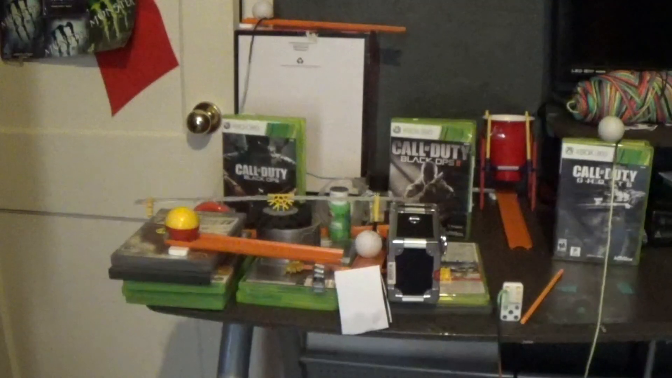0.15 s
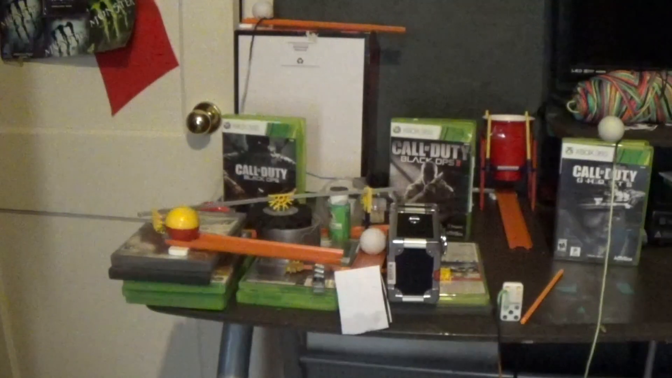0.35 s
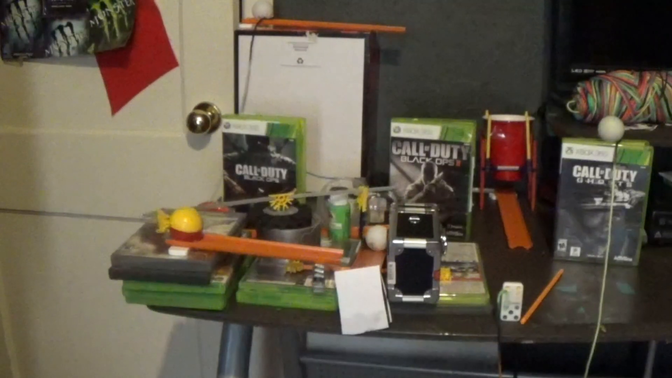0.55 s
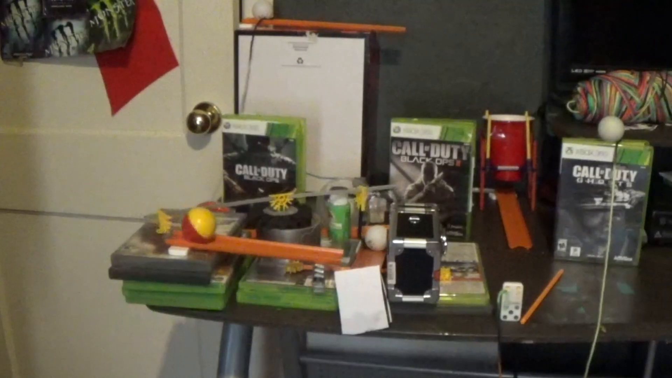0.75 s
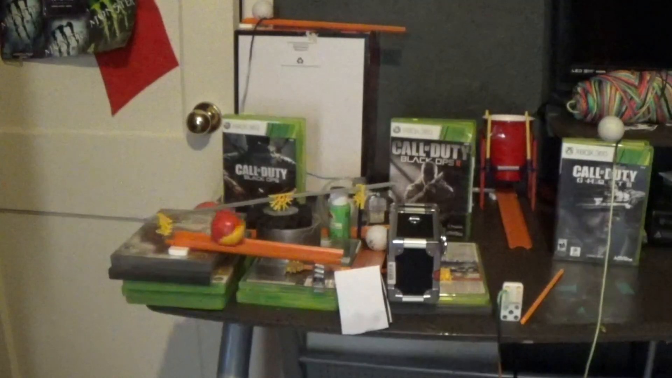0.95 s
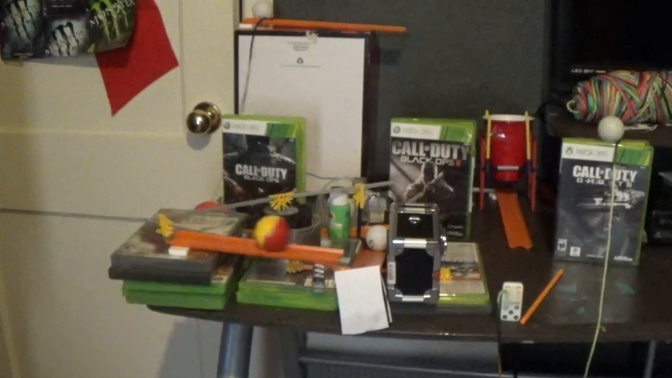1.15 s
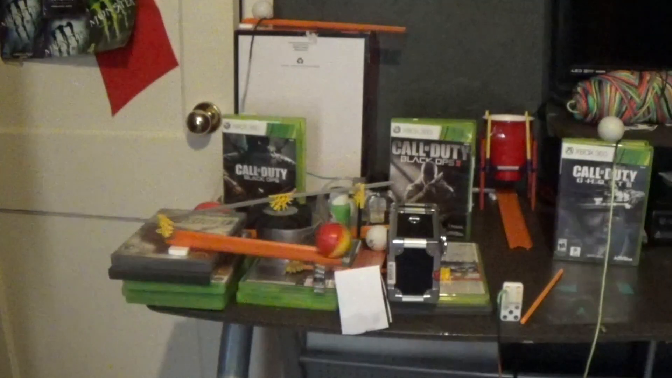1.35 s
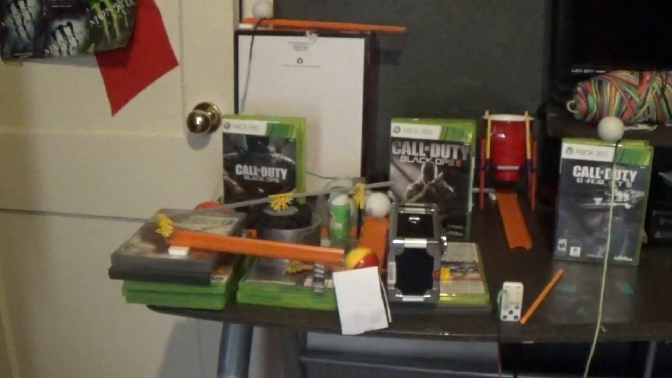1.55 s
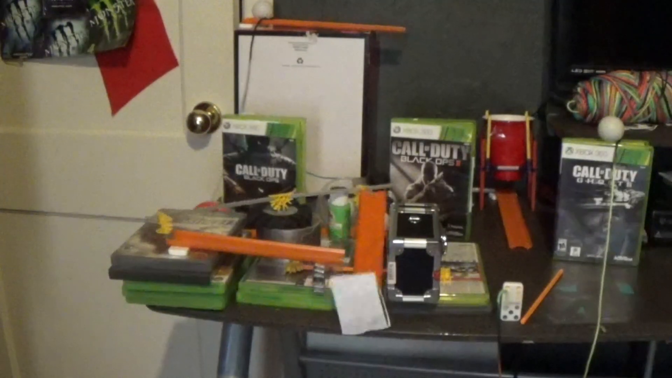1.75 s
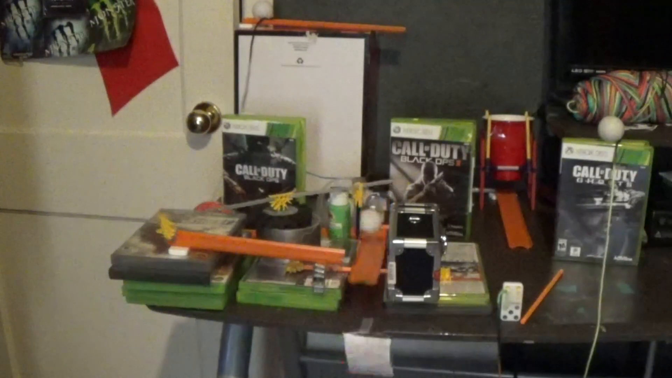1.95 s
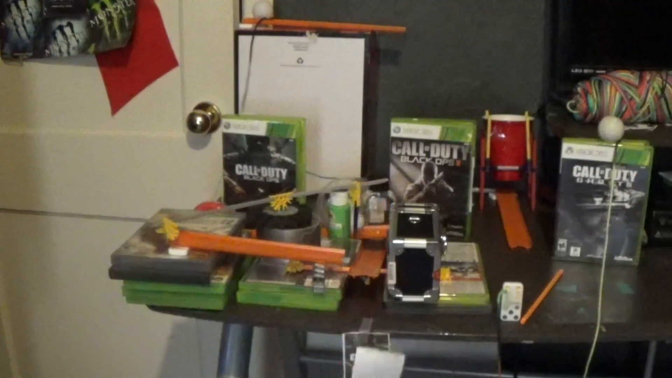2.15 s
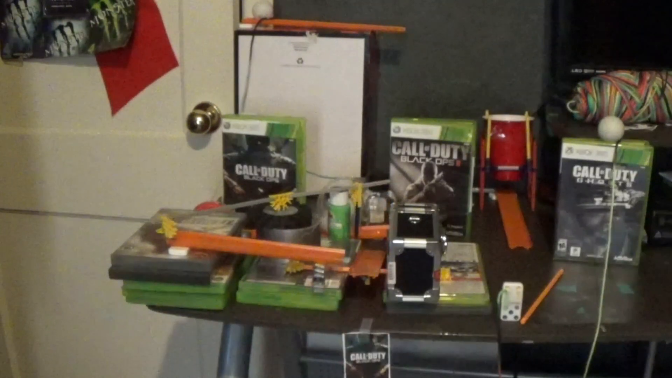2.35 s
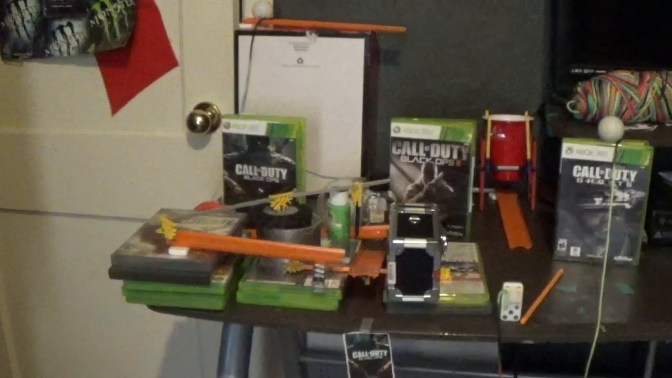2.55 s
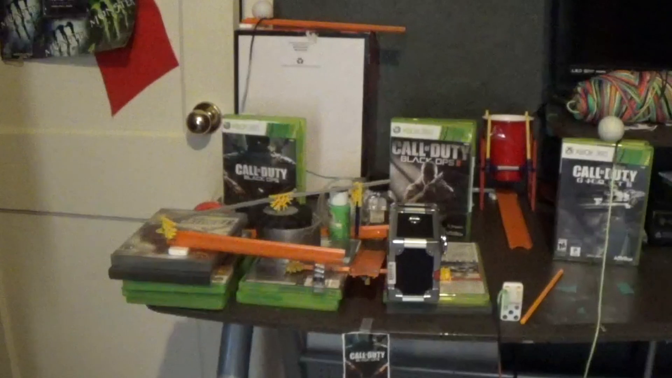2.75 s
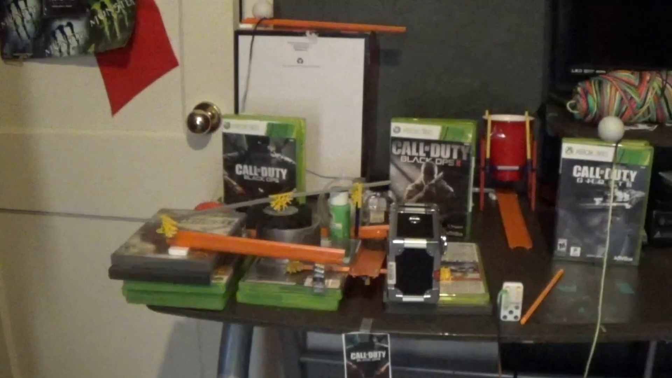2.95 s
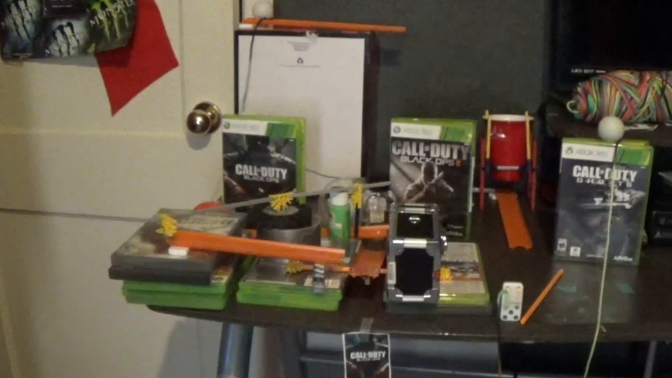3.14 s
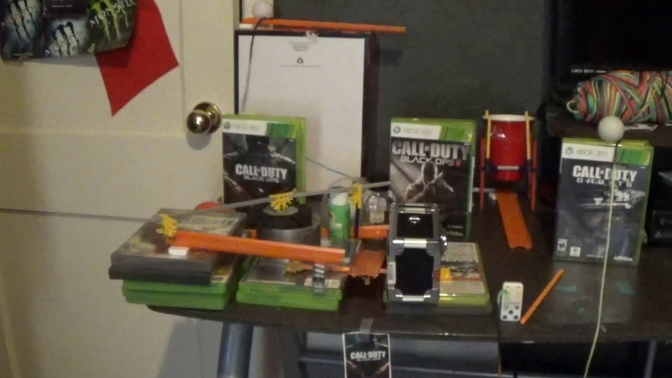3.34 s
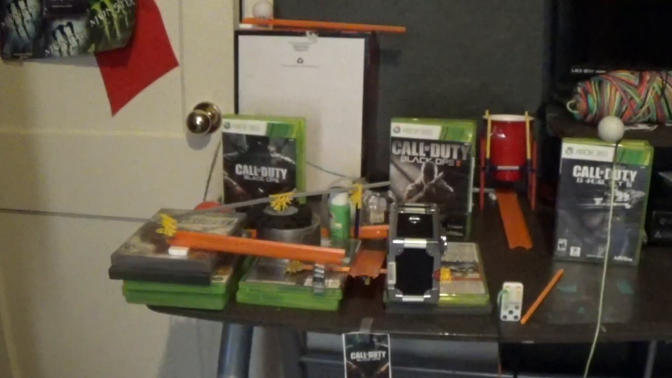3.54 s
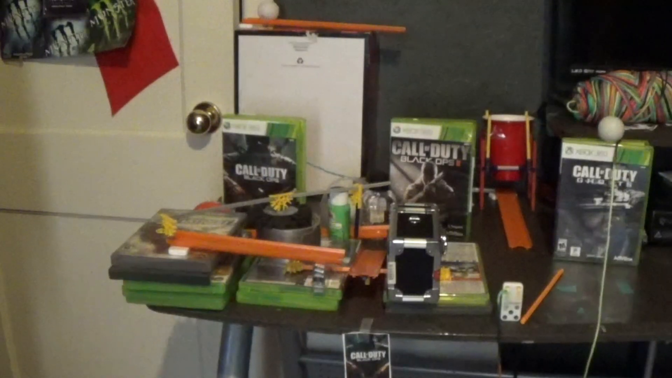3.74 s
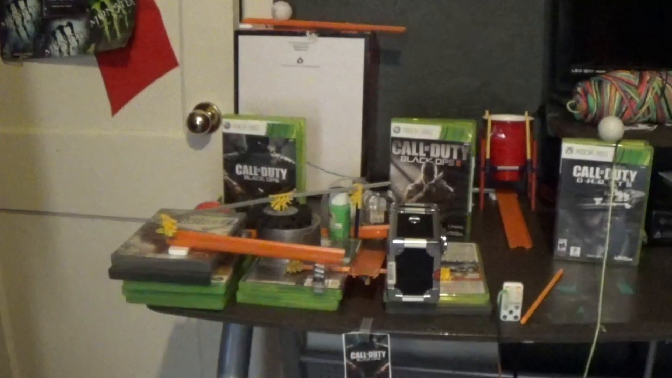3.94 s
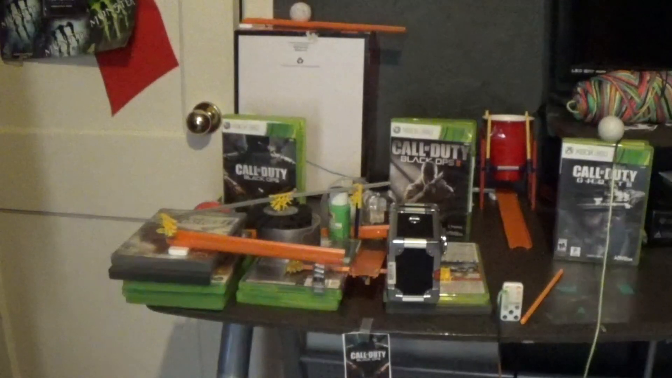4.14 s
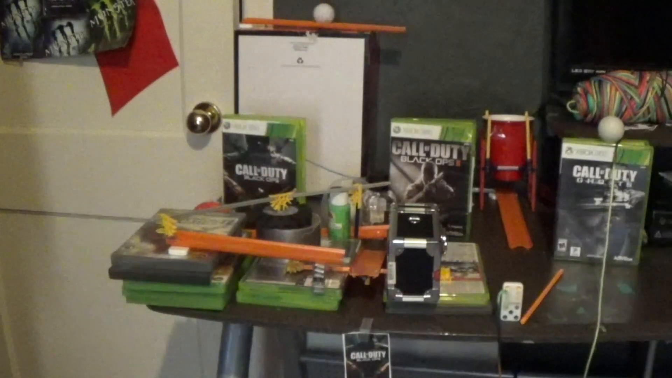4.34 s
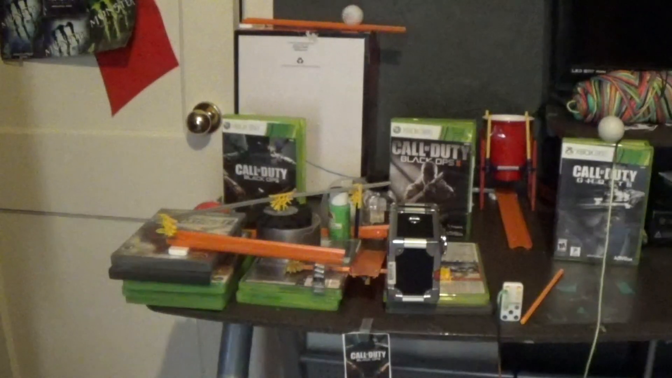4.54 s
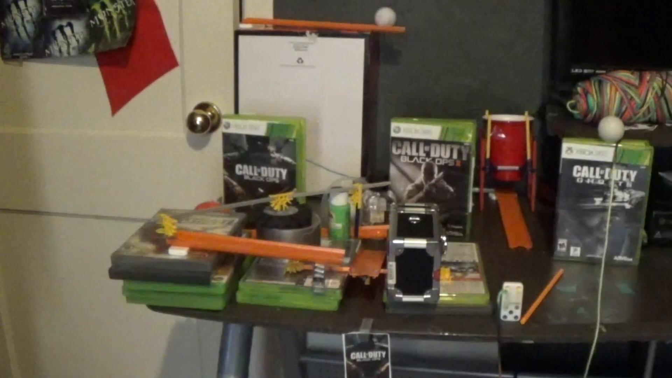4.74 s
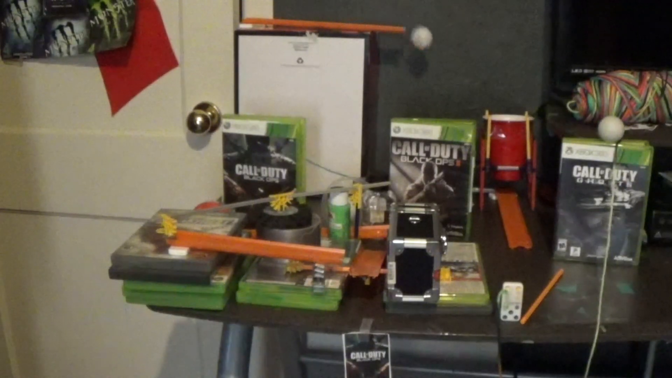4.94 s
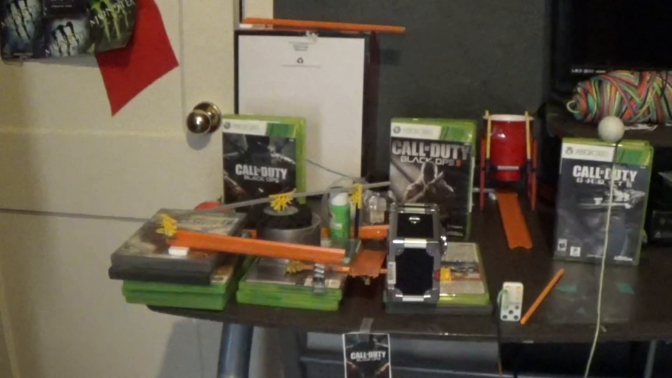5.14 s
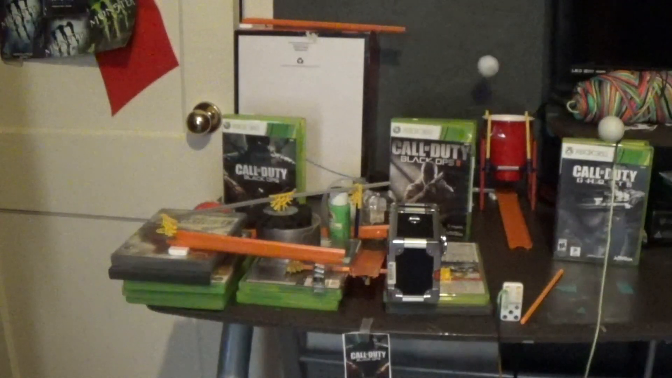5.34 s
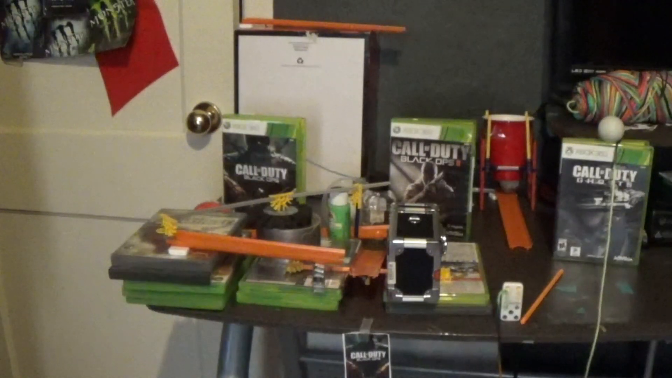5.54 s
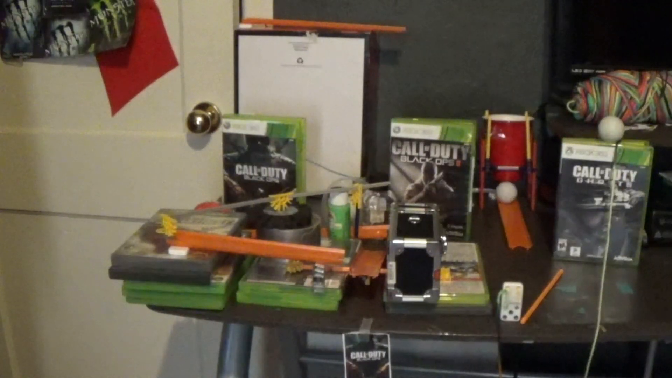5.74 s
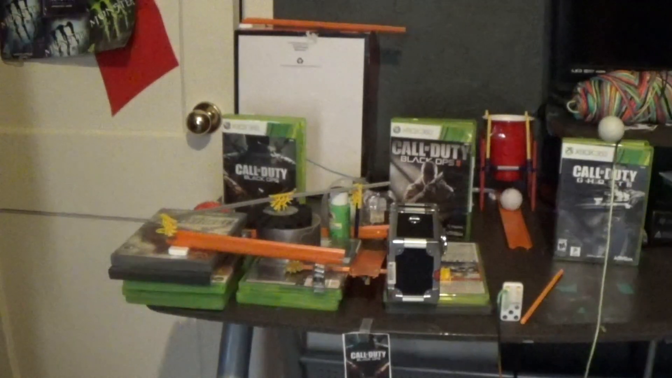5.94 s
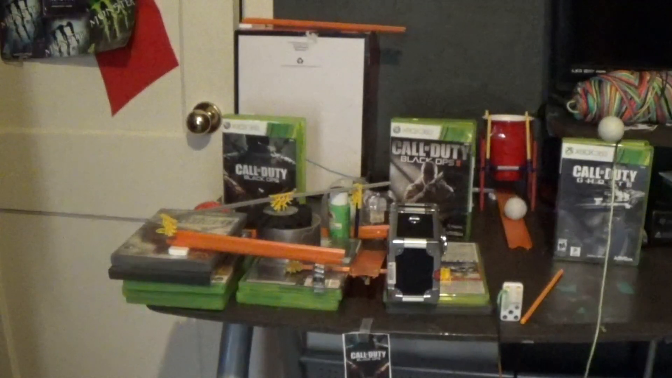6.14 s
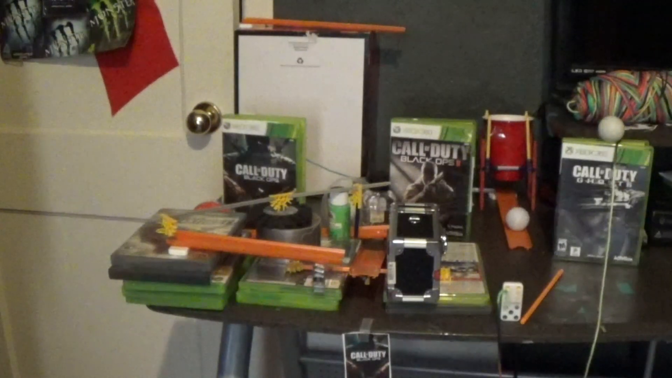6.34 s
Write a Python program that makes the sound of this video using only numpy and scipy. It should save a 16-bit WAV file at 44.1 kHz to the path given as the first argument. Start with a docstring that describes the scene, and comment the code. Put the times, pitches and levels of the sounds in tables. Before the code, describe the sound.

A quiet fan, soft air and low hum, runs throughout a small, briefly echoing room. A ball rolls very faintly until 0.36 s; a trigger clicks twice at 0.44 with a bright ring, and a light tap follows at 0.58. From 1.47 to 1.83 hard levers snap, a heavy ball knocks dully on stacked cases and a light ball taps sharply; plastic track clacks at 2.0. At 2.24 a falling case thuds loudly, shuddering and ringing low, then knocks more softly at 2.6 and 2.8 as another ball rolls. It stumbles near 3.1 and bounces faster and softer from 3.2 to 3.5. A small weight thumps at 3.69, with a faint hop at 3.96, over light rolling until 5.0. At 5.16 a ball slaps a hollow case with a buzzing lid; it ticks a rim at 5.55, rattles brightly in a plastic cup at 5.6, then rolls softly from 5.7 to the end.

```python
"""Table-top chain reaction

A ball rolls down plastic track and trips levers that click and clack. A hanging case drops, thuds against
the table and swings back; a light ball chatters to rest, a weight lands, and a ball bounces off a hollow
case into a plastic cup. Each blow is a sharp contact plus body and room sound; some things ring on too.
Rolling is a stream of tiny bumps. A fan, made of filtered noise and a low hum, runs quietly underneath."""
import sys
import numpy as np
from scipy import signal
from scipy.fft import rfft, irfft
from scipy.io import wavfile
from scipy.ndimage import uniform_filter1d

SR = 44100
rng = np.random.default_rng(int(sys.argv[2]) if len(sys.argv) > 2 else 0)


def master_out(mix):
    """Clip the mix to full scale and print it as 16-bit PCM to the path in sys.argv[1]."""
    frames = np.transpose(np.atleast_2d(mix))
    ceiling = np.clip(frames, -1, 1)
    pcm = np.round(ceiling * 32767).astype(np.int16)
    wavfile.write(sys.argv[1], SR, pcm)


N = 281799  # length of the scene in samples
TAIL = 32768  # longest sound of one blow, in samples
TOP_HZ = 11120  # the treble ends here
SIDE_DB = -9.5  # left-right difference against the shared sound

# Blows. Each row: start in seconds, contact level in dB before the source's gain,
# brightness in dB per octave, room level in dB added to the source's own.
# The first trigger letting go (columns as above)
TRIGGER_BLOWS = [(0.437, -17, 1.6, -11), (0.457, -25.5, -2.6, 1.5)]
# Hard plastic levers snapping over (same columns)
LEVER_BLOWS = [(1.473, -10, 4.5, -18), (1.477, -16, -3, 1), (1.547, -24, 0, -8), (1.557, -23.5, -2, -2),
               (1.588, -24.5, -4, -7), (1.648, -38, -1, -2)]
# A piece of track tipping over and settling (same columns)
TRACK_BLOWS = [(1.602, -25, 1, 0), (1.605, -23, 1, 6), (1.637, -25.5, -1.5, 2.5), (1.916, -31, 0.7, 7),
               (1.999, -9.5, 1.5, 1.5), (2.029, -21, 0, -12), (2.091, -20.5, -0.1, 2), (2.132, -36, 2.5, 9)]
# The light ball tapping hard plastic (same columns)
BALL_BLOWS = [(0.581, -24.5, 5.5, -4), (0.645, -43, 5, -9), (1.685, -20.5, 2, 3), (1.698, -6.5, 1.5, -6),
              (1.705, -14.5, -2, 8), (1.735, -19.5, -3, 7), (1.761, -21.5, 1, 2), (1.825, -30, 7, 6)]
# The heavy ball knocking on the stack of cases (same columns)
STACK_BLOWS = [(1.492, -15.5, 0.88, -2.6), (1.639, -37, 0.35, -2), (1.828, -15, 1.8, 0)]
# The falling case hitting the table front and shuddering (same columns)
CASE_BLOWS = [(2.243, -6, 0.65, -0.5), (2.259, -15.5, 0, 0.5), (2.267, -10.5, -1.5, -9),
              (2.274, -20, -3, -11), (2.297, -18, -4, -17), (2.348, -30.5, -1.5, -11)]
# The case swinging back on its string (same columns)
SWING_BLOWS = [(2.601, -16.5, -0.56, -0.28), (2.792, -25, 1.6, -0.96)]
# The light ball stumbling twice before it drops and settles (same columns)
STUMBLE_BLOWS = [(3.109, -21, 0.44, 0), (3.151, -22.5, 0.068, 0)]
# A small weight landing, and its one hop (same columns)
WEIGHT_BLOWS = [(3.685, -10, 0, -0.5), (3.958, -34, 0.67, 1)]
# A second light ball slapping a hollow case, whose lid buzzes (same columns)
LID_BLOWS = [(5.158, -13, 0.5, -3), (5.165, -11, 1.5, -4.5), (5.172, -18, 1, -1.5), (5.179, -19, -1.4, -3),
             (5.191, -17, 1.3, -3.5)]
# That ball grazing the rim of the cup (same columns)
RIM_BLOWS = [(5.552, -19.5, 0.27, -0.5), (5.586, -18, 2.1, -13)]
# That ball rattling round the cup (same columns)
CUP_BLOWS = [(5.600, -3.5, 1.0, -8.5), (5.608, -12, 1, -9), (5.614, -16, -0.73, -2),
             (5.624, -10, 0.095, -8.5), (5.642, -22.5, -0.74, 0), (5.659, -14.5, -0.5, -10)]

# Repeats of the contact from surfaces close to the bouncing ball. Each row: delay in seconds, level in dB.
NEARBY_ECHOES = [(.0024, -3.5), (.0064, -5.5), (.018, -14)]

# Tone colours of the struck things. Each row: frequency in Hz, relative level in dB.
# Trigger (columns as above)
TRIGGER_COLOUR = [(60, -40), (230, -34), (900, -6), (2300, -14), (2800, -5.5), (3400, -8), (3950, -4),
                  (4300, -4), (4700, 1), (5100, -2), (6500, -3), (7100, -12), (8150, -6), (9400, -13),
                  (10000, -4.5), (11000, -15)]
# Levers (same columns)
LEVER_COLOUR = [(88, -50), (150, -48), (938, -14.5), (1920, -7), (2180, 0), (3550, -5), (4400, -1),
                (5030, -6), (5700, 3.5), (6500, -4.5), (7020, -7), (9000, 0), (10200, -4.5), (11000, -16)]
# Track piece (same columns)
TRACK_COLOUR = [(88, -55), (150, -24), (389, -11), (482, -17), (704, -1), (873, -10.5), (1040, 4),
                (1270, -11), (1370, -2), (2200, -4), (3800, -7.5), (4170, -3.5), (4800, -10.5),
                (6700, -13.5), (7700, -23), (8500, -15), (11000, -15.5)]
# Light ball on hard plastic (same columns)
BALL_COLOUR = [(88, -39), (150, -40), (239, -25), (297, -11), (577, -6.5), (1600, -7), (2260, -1),
               (2700, -9), (3300, -1.5), (3650, -7), (4100, -2.5), (5300, -8.5), (5900, -8), (6650, -17.5),
               (7410, -19.5), (8900, -7), (9450, -15), (10400, -8), (11000, -11)]
# Stack of cases (same columns)
STACK_COLOUR = [(100, -28), (200, -17.5), (350, -1.5), (700, 2), (1200, 1.5), (1700, -5.5), (2200, -16),
                (2600, -24), (5000, -31), (7500, -39), (11000, -46)]
# Falling case (same columns)
CASE_COLOUR = [(40, -30), (140, -19), (240, 0.5), (330, -2.5), (450, 2.5), (750, -2), (950, -8),
               (1100, -17.5), (3200, -19), (5500, -24.5), (7500, -35.5), (11000, -43.5)]
# Case swinging back (same columns)
SWING_COLOUR = [(50, -36), (140, -20.5), (200, -12.5), (240, -3.5), (400, -5.5), (520, -5.5), (700, -23),
                (1000, -18.5), (2600, -22.5), (4500, -36.5), (11000, -51)]
# Ball bouncing on the spot (same columns)
BOUNCE_COLOUR = [(60, -27), (190, -19), (240, -17), (480, -2.5), (900, -1.5), (1130, 6.5), (1400, -2.5),
                 (1780, 0), (2280, -19.5), (2800, -4.5), (3200, -5), (3700, -21), (4300, -15), (7000, -26),
                 (11000, -18)]
# Small weight (same columns)
WEIGHT_COLOUR = [(35, -73), (60, -38), (121, -21), (227, -14), (351, -6.5), (446, -4.5), (476, -2),
                 (567, -2), (839, -7.5), (1110, -18), (1360, -13.5), (3040, -20.5), (5240, -30),
                 (9860, -37), (11000, -39)]
# Hollow case and its lid (same columns)
LID_COLOUR = [(50, -45), (130, -14), (240, -23), (310, -1.5), (380, -10), (600, 2), (850, -4), (1400, -0.5),
              (1750, -2.5), (2100, -6), (2500, -17), (3100, -13), (3500, -9.5), (4400, -25), (4820, -17.5),
              (5100, -22), (5320, -20), (5850, -32), (7100, -21), (7650, -35), (11000, -28)]
# Rim of the cup (same columns)
RIM_COLOUR = [(60, -39), (300, -10), (1500, -9), (3000, -11), (3600, -1.5), (4300, -3), (4900, -6),
              (5500, -6), (6600, -14), (8600, -8), (11000, -10)]
# Inside of the cup (same columns)
CUP_COLOUR = [(50, -29), (200, -21), (300, -4), (1250, -3.5), (1520, 1), (1750, 1), (2300, -3), (3100, 3.5),
              (3400, 0.5), (3750, 4.5), (4400, -0.5), (4800, -4), (7200, -12), (11000, -11)]

# Tones that ring on. Each row: frequency in Hz, relative level in dB, time to fall 60 dB in seconds.
# Trigger (columns as above)
TRIGGER_RING = [(2720, -10, 0.33), (2800, -5, 0.36), (3880, -5, 0.35), (4770, 1, 0.26), (4680, -2, 0.32),
                (4880, -3, 0.3), (5500, -6, 0.22), (8150, -6, 0.15)]
# Light ball on hard plastic (same columns)
BALL_RING = [(2750, -4, 0.25), (4000, 0, 0.22)]
# Falling case (same columns)
CASE_RING = [(246, 14.5, 0.11), (270, -2, 0.26), (293, 4, 0.25), (345, -5, 0.22), (398, 13, 0.19),
             (477, 8, 0.17), (525, -7, 0.28), (568, -8, .18), (680, 1, 0.17), (772, -1, 0.39),
             (855, -3, 0.29), (920, -15, 0.3)]
# Case swinging back (same columns)
SWING_RING = [(234.8, -2, 0.18), (260.7, -5, 0.22), (322, -4.5, 0.25), (403, -2.5, 0.23)]
# Ball bouncing on the spot (same columns)
BOUNCE_RING = [(8850, 0, 0.014), (10280, 1, 0.02)]
# Small weight (same columns)
WEIGHT_RING = [(288, -10, 0.38), (347, -3, 0.27), (422, -3, 0.2), (488, 1, 0.27), (540, -1, 0.28),
               (708, -3, 0.29), (824, -4, 0.26), (865, -16, 0.26)]
# Hollow case and its lid (same columns)
LID_RING = [(610, 17, 0.25), (914, 12, 0.26), (1270, -3, .3), (1390, 2, 0.27), (1510, -4, 0.27),
            (1607, 0, 0.33), (1700, 1, 0.44), (2140, -6, 0.47), (3350, -5, 0.37), (3600, -7, .3),
            (4870, -16, .28), (5270, -14, .28)]
# Rim of the cup (same columns)
RIM_RING = [(4360, 5, 0.062), (3550, -4, 0.074), (5500, -5, 0.064)]
# Inside of the cup (same columns)
CUP_RING = [(1380, -2, 0.23), (1525, 2, 0.16), (2600, -2.2, 0.16), (3170, 2, 0.19), (3492, -0.2, 0.17),
            (3610, 1, 0.17), (3777, 0, 0.17), (4280, -1, 0.17), (4180, -2, .17)]

# Shell resonances of the first light ball. Each row: frequency in Hz, width in Hz, relative level in dB.
FIRST_SHELL = [(8870, 840, 1), (10240, 530, -0.5)]
# Shell resonances of the ball that flies into the cup (same columns)
SECOND_SHELL = [(8480, 570, 0.5), (10060, 960, -4.5)]

# Runs along the track. Each row: start in seconds, end in seconds, starting rumble level in dB,
# starting shell fizz level in dB, change over the run in dB.
TRACK_RUNS = [(0, 0.358, -73, -65.5, 10), (2.302, 3.13, -55.5, -70, -1), (3.48, 5.0, -55.5, -68, -6),
              (5.7, 6.45, -56.5, -69, -4.5)]
# Colour of the rolling rumble. Each row: frequency in Hz, relative level in dB.
RUMBLE_COLOUR = [(30, -25), (100, -17), (250, -12), (400, -9.5), (700, -8), (1500, -25.5), (4000, -18.5),
                 (11000, -31.5)]
# How fast the room dies away. Each row: frequency in Hz, time to fall 60 dB in seconds.
ROOM_DECAY = [(150, 0.33), (500, 0.42), (1500, 0.35), (4000, 0.32), (10000, 0.26)]
# Stereo width of machine and rolling. Each row: frequency in Hz, gain of the left-right difference in dB.
MACHINE_WIDTH = [(500, -.5), (1200, -2), (5000, -1), (9000, -6)]
# Colour of the fan's air. Each row: frequency in Hz, relative level in dB.
AIR_COLOUR = [(18, -76), (30, -48), (58, -54), (77, -22), (142, -16), (165, -15), (257, -4), (321, -4.5),
              (364, -4), (554, -5), (596, -4), (953, -11), (1220, -11.5), (4520, -21), (11000, -27.5)]
# Fan tones, the lowest being the motor. Each row: frequency in Hz, level in dB.
FAN_TONES = [(91.5, -72), (452.2, -66), (592.2, -67.5), (877.5, -83)]
# Stereo width of the fan noise. Each row: frequency in Hz, gain of the left-right difference in dB.
FAN_WIDTH = [(60, -22), (110, -22), (190, -23), (350, -22), (620, -14.5), (1110, -7.5), (2000, -6.5),
             (3580, -6), (6430, -2), (11500, -6.5)]


def machine():
    """All the things that are struck, from the first trigger to the cup."""
    start = trigger() + levers() + track() + ball_taps() + stack()
    middle = falling_case() + swinging_case() + bouncing_ball() + weight()
    return start + middle + lid() + cup_rim() + cup()


def trigger():
    """A trigger lets go with two clicks and a bright ring."""
    return blows(TRIGGER_BLOWS, TRIGGER_COLOUR, gain_db=1.5, body_s=0.051, body_db=4.5, room_db=5,
                 pan_db=0.5, modes=TRIGGER_RING, modes_db=-4.5)


def levers():
    """Hard plastic levers snap over with dense, bright clicks."""
    return blows(LEVER_BLOWS, LEVER_COLOUR, gain_db=1.5, body_s=0.059, body_db=7.5, room_db=8, pan_db=0.5)


def track():
    """A piece of plastic track clacks as it tips and settles."""
    return blows(TRACK_BLOWS, TRACK_COLOUR, gain_db=1, body_s=0.033, body_db=7, room_db=4.5, pan_db=0)


def ball_taps():
    """A light ball taps hard plastic and its thin shell adds treble."""
    return blows(BALL_BLOWS, BALL_COLOUR, gain_db=-2, body_s=0.015, body_db=4, room_db=3, pan_db=0,
                 ball=FIRST_SHELL, ball_db=-10.5, modes=BALL_RING, modes_db=-7.5)


def stack():
    """A heavy ball knocks on stacked cases, which answer with a dull, dense sound."""
    return blows(STACK_BLOWS, STACK_COLOUR, gain_db=-0.5, body_s=0.075, body_db=7.5, room_db=8, pan_db=-0.5)


def falling_case():
    """A case hits the table front, and its low tones ring while it shudders."""
    return blows(CASE_BLOWS, CASE_COLOUR, gain_db=3.5, body_s=0.031, body_db=0.5, room_db=4.5,
                 pan_db=-1.5, modes=CASE_RING, modes_db=-4.5)


def swinging_case():
    """The case swings back on its string with two softer, ringing knocks."""
    return blows(SWING_BLOWS, SWING_COLOUR, gain_db=2, body_s=0.024, body_db=-1.5, room_db=1.5,
                 pan_db=-1, modes=SWING_RING, modes_db=3)


def bouncing_ball():
    """A light ball stumbles twice, then bounces ever faster on one spot, with echoes from close by."""
    return blows([*STUMBLE_BLOWS, *settling()], BOUNCE_COLOUR, gain_db=-9.5, body_s=0.011, body_db=9.5,
                 room_db=11.5, pan_db=0, ball=FIRST_SHELL, ball_db=-11.5, modes=BOUNCE_RING, modes_db=1,
                 echoes=NEARBY_ECHOES, moving=False)


def settling(count=10):
    """A dropped ball keeps a share of its speed at each bounce, so hops get shorter and softer together."""
    drop_s, first_hop_s, speed_kept = 3.204, 0.0393, 0.906
    first_db, loss_db, bright_db = -20, 1.12, 0  # level before gain, loss per bounce, tilt per octave
    k = np.arange(count)
    hops = first_hop_s * speed_kept ** k
    starts = drop_s + np.cumsum(hops) - hops
    levels = first_db - loss_db * k
    return [(s, db, bright_db, 0) for s, db in zip(starts, levels)]


def weight():
    """A small weight lands and hops once, setting low tones ringing."""
    return blows(WEIGHT_BLOWS, WEIGHT_COLOUR, gain_db=1.5, body_s=0.038, body_db=3.5, room_db=5,
                 pan_db=0, modes=WEIGHT_RING, modes_db=1.5)


def lid():
    """A second light ball slaps a hollow case; the lid's quick repeated taps make a buzz."""
    return blows(LID_BLOWS, LID_COLOUR, gain_db=0, body_s=0.021, body_db=9.5, room_db=11, pan_db=-0.4,
                 ball=SECOND_SHELL, ball_db=-4, modes=LID_RING, modes_db=1.5)


def cup_rim():
    """The ball grazes the rim with two ticks and a short ring."""
    return blows(RIM_BLOWS, RIM_COLOUR, gain_db=1.5, body_s=0.051, body_db=5, room_db=5.5, pan_db=-1,
                 modes=RIM_RING, modes_db=2)


def cup():
    """The ball rattles round the cup, whose wall rings with its shell."""
    return blows(CUP_BLOWS, CUP_COLOUR, gain_db=0, body_s=0.032, body_db=-0.5, room_db=16, pan_db=-0.5,
                 ball=SECOND_SHELL, ball_db=-5, modes=CUP_RING, modes_db=-1)


def blows(table, colour, gain_db, body_s, body_db, room_db, pan_db, ball=(), ball_db=0,
          modes=(), modes_db=0, echoes=(), moving=True):
    """Each blow is a sharp contact, a burst of dense body modes, any long modes, and the room's answer."""
    hz = bins(TAIL)
    out = np.zeros((2, N + TAIL))
    gain = undb(lookup(colour, hz)) + undb(ball_db) * shell(hz, ball)
    ring = ringing(modes) * undb(modes_db) if modes else 0
    for k, (s, db, bright_db, share_db) in enumerate(table):
        if moving or k == 0:  # each new spot excites the body and the room differently
            near = undb(body_db) * body(body_s)
            far = room()
            near[:, 0] += 1  # the contact itself
            repeats = sum(undb(echo_db) * np.roll(near, int(lag * SR), axis=1) for lag, echo_db in echoes)
            near = near + repeats
        # a harder contact tilts the spectrum upwards
        tilt = undb(bright_db * np.log2(hz / 1000))
        contact = causal(gain * tilt / (1 + (hz / TOP_HZ) ** 20))
        contact /= np.abs(contact).max()
        response = near + undb(room_db + share_db) * far
        sound = irfft(rfft(contact) * rfft(response))
        sound = sound + ring * np.linalg.norm(contact)
        start = int(s * SR)
        out[:, start:start + TAIL] += undb(db + gain_db) * sound
    pan = undb(np.array([[pan_db], [-pan_db]]) / 2)  # positive leans left
    return out[:, :N] * pan


def shell(hz, resonances):
    """The two bright resonances of a thin-walled ball."""
    return sum(undb(db) / (1 + ((hz - f) / width * 2) ** 6) ** 0.5 for f, width, db in resonances)


def body(t60, treble_share=0.92):
    """Dense, short modes of a plastic body; the high ones stop first."""
    return unit(dying(stereo_noise(TAIL), [(600, t60), (7000, t60 * treble_share)]))


def ringing(modes):
    """Damped sines that swell over a few cycles, slightly out of step between left and right."""
    t, out = np.arange(TAIL) / SR, 0
    turns = rng.random(len(modes))
    leans = rng.choice([-1, 1], len(modes))
    for (f, db, t60), turn, lean in zip(modes, turns, leans):
        apart = lean * undb(SIDE_DB) * np.array([[1], [-1]])
        phase = 2 * np.pi * (f * t + turn) + apart
        swell = 1 - np.exp(-t * f / 2)
        out = out + undb(db) * fade(t60) * swell * np.sin(phase)
    return unit(out)


def rolling(bumps_per_s=220, scatter_db=4):
    """Tiny bumps in the track make it rumble and the ball's shell fizz; each run swells, drifts and dies."""
    attack_s, release_s = 0.014, 0.037
    t, rumble, fizz = np.arange(N) / SR, 0, 0
    for start, end, rumble_db, fizz_db, drift_db in TRACK_RUNS:
        gate = np.clip((t - start) / attack_s, 0, 1) * np.clip((end - t) / release_s, 0, 1)
        progress = np.clip((t - start) / (end - start), 0, 1)
        run = gate * undb(drift_db * progress)
        rumble = rumble + undb(rumble_db) * run
        fizz = fizz + undb(fizz_db) * run
    sizes = undb(scatter_db * np.clip(rng.standard_normal(N), -2, 2))
    bumps = (rng.random(N) < bumps_per_s / SR) * sizes
    heard = bumps + signal.fftconvolve(bumps[None], room(), axes=1)[:, :N]
    hz = bins(N)
    track_sound = coloured(heard, undb(lookup(RUMBLE_COLOUR, hz)))
    shell_sound = coloured(heard, shell(hz, FIRST_SHELL))
    return rumble * track_sound + fizz * shell_sound


def room(build_s=0.0041, lumpy_db=6.5, lumpy_s=0.18):
    """Distinct early reflections merge into a tail whose treble dies first."""
    t = np.arange(TAIL) / SR
    lumps = undb(lumpy_db * rng.standard_normal(TAIL) * np.exp(-t / lumpy_s))
    lumps /= np.sqrt(uniform_filter1d(lumps ** 2, size=400))  # keep the average level even
    build_up = 1 - np.exp(-(t / build_s) ** 2)
    return unit(dying(stereo_noise(TAIL) * lumps, ROOM_DECAY) * build_up)


def fan(line_width_hz=6, air_db=-51):
    """Steady rush of air, a clean motor hum and a few wavering blade tones."""
    hz = bins(N)
    (motor_hz, motor_db), *blades = sorted(FAN_TONES)
    motor = undb(motor_db) * np.sqrt(2) * np.sin(2 * np.pi * motor_hz * np.arange(N) / SR)
    air = widened(rng.standard_normal((2, N)), FAN_WIDTH)
    swirl = widened(rng.standard_normal((2, N)), FAN_WIDTH)
    tones = 0
    for f, db in blades:  # a narrow band of noise wavers like an unsteady tone
        narrow = 1 / (1 + ((hz - f) / line_width_hz) ** 2)
        tones = tones + undb(db) * coloured(swirl, narrow)
    return motor + tones + undb(air_db) * coloured(air, undb(lookup(AIR_COLOUR, hz)))


def stereo_noise(size):
    """Diffuse sound: left and right share most of the noise and differ a little."""
    mid, side = rng.standard_normal((2, size))
    return mid + undb(SIDE_DB) * side * np.array([[1], [-1]])


def dying(noise, t60s):
    """Let each part of the spectrum die at its own rate, given as (Hz, seconds to fall 60 dB) points."""
    centres, t60s = np.transpose(t60s)
    shares = [np.interp(np.log(bins(TAIL)), np.log(centres), row) for row in np.eye(len(t60s))]
    spectrum = rfft(noise)
    return sum(irfft(spectrum * share) * fade(t60) for share, t60 in zip(shares, t60s))


def fade(t60):
    """Exponential decay that loses 60 dB in t60 seconds."""
    return np.exp(-np.log(1000) * np.arange(TAIL) / SR / max(t60, 1e-3))


def causal(gain):
    """The most compact pulse that has this spectrum and nothing before its start."""
    cepstrum = irfft(np.log(gain + 1e-9))
    cepstrum[1:TAIL // 2] *= 2  # fold the backward half onto the forward half
    cepstrum[TAIL // 2 + 1:] = 0
    return irfft(np.exp(rfft(cepstrum)))


def coloured(x, gain):
    """Filter by a spectrum and bring to an rms level of 1."""
    return unit(irfft(rfft(x) * gain, N)) * np.sqrt(N)


def widened(x, width):
    """Weight the difference between the channels by (Hz, dB) points."""
    mid, side = (x[0] + x[1]) / 2, (x[0] - x[1]) / 2
    side = irfft(rfft(side) * undb(lookup(width, bins(N))), N)
    return np.array([mid + side, mid - side])


def undb(db):
    """Decibels to gain."""
    return 10 ** (np.asarray(db) / 20)


def unit(x):
    """Scale to unit energy per channel, on average."""
    return x / np.sqrt(np.mean(np.sum(x ** 2, axis=-1)))


def bins(size):
    """Frequencies in Hz of a spectrum of so many samples, kept at 1 or more for logarithms."""
    return np.maximum(np.fft.rfftfreq(size, 1 / SR), 1)


def lookup(points, hz):
    """Join (Hz, value) points on a log-frequency axis."""
    f, value = np.transpose(points)
    return np.interp(np.log(hz), np.log(f), value)


def scene():
    """The machine running in the quiet room, its top treble narrowed, over the fan."""
    return widened(machine() + rolling(), MACHINE_WIDTH) + fan()


def record(dry, ceiling=0.65):
    """Round off the highest peaks, then cut the top treble steeply."""
    rounded = ceiling * np.tanh(dry / ceiling)
    lowpass = signal.ellip(10, 0.2, 70, TOP_HZ, fs=SR, output="sos")
    return signal.sosfilt(lowpass, rounded)


dry = scene()
out = record(dry)
master_out(out)
```